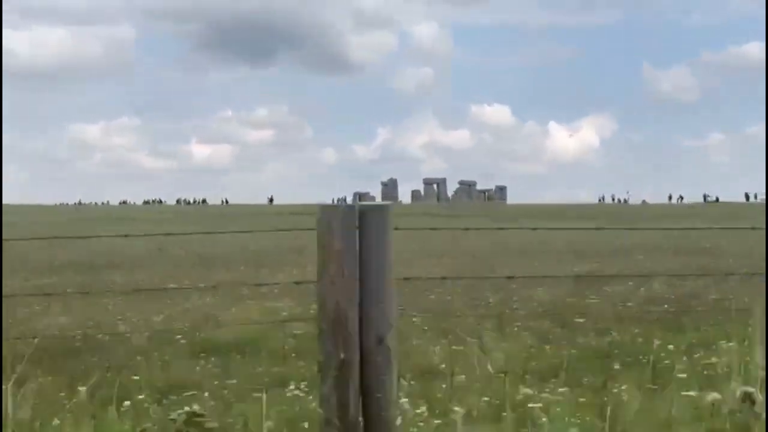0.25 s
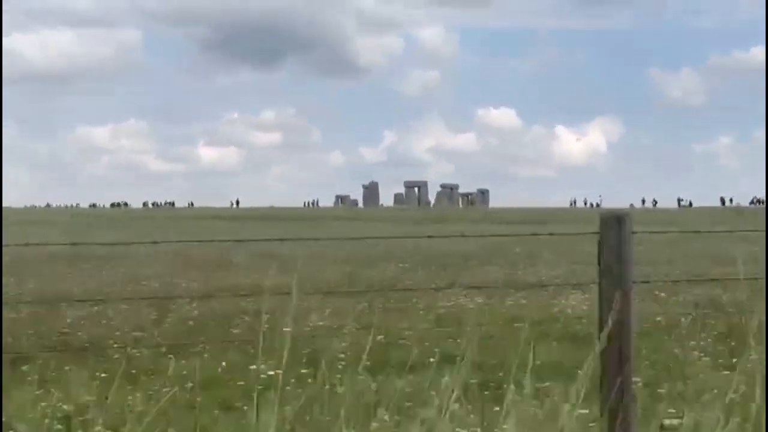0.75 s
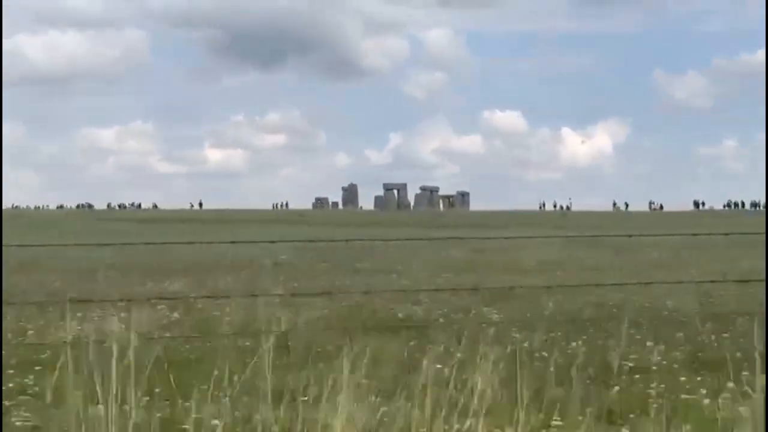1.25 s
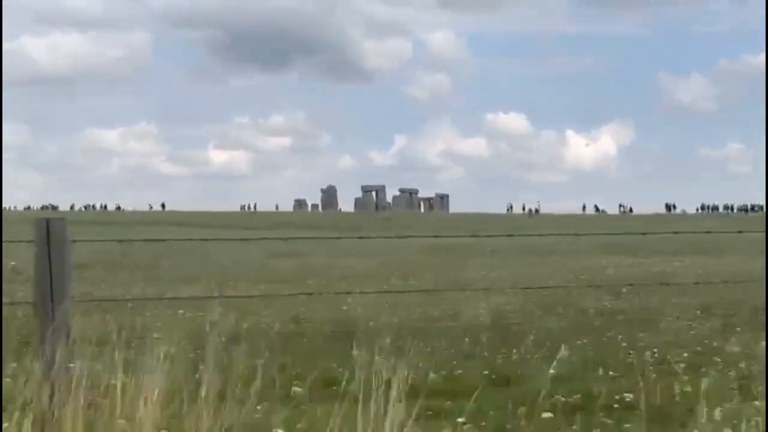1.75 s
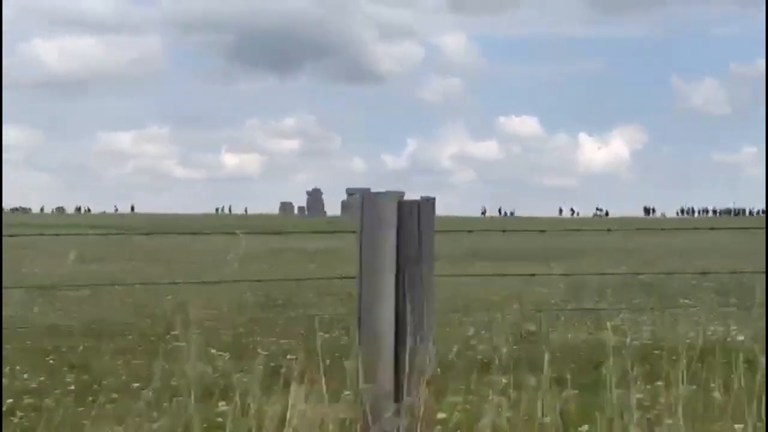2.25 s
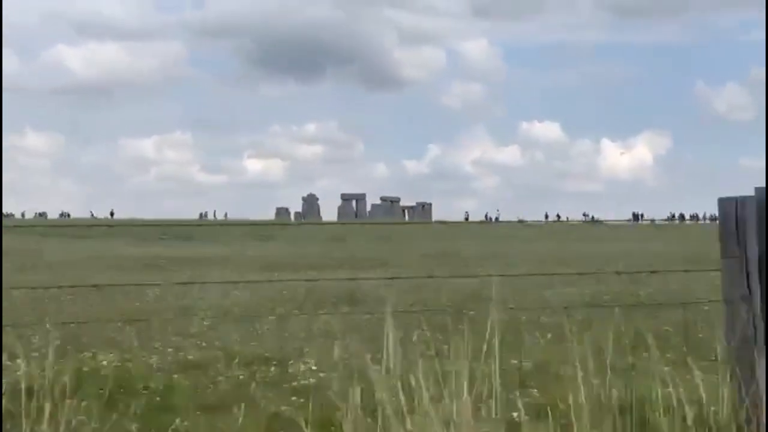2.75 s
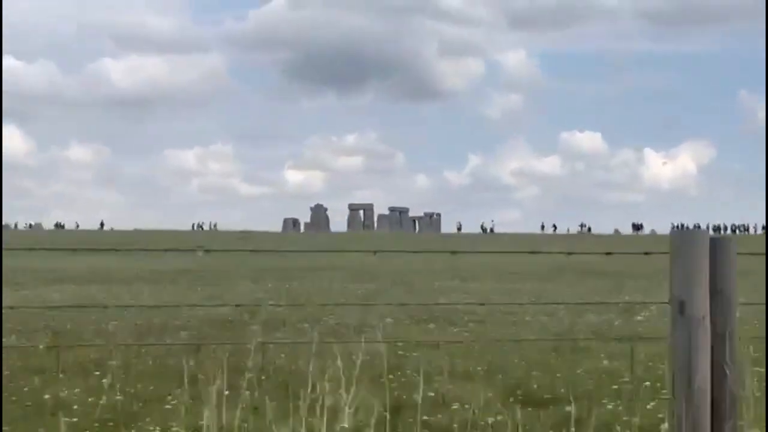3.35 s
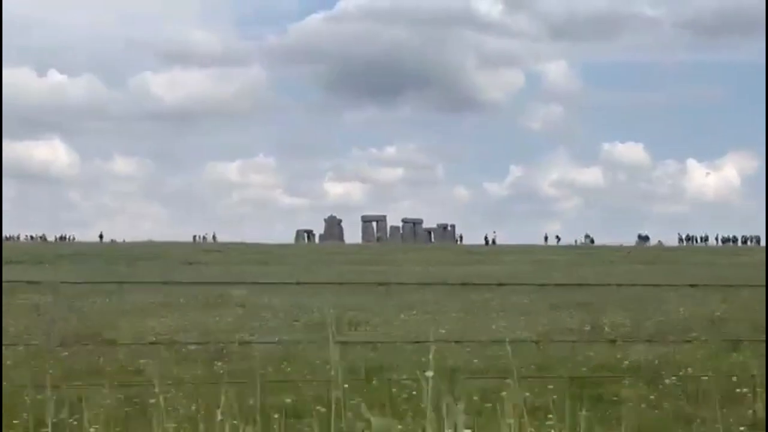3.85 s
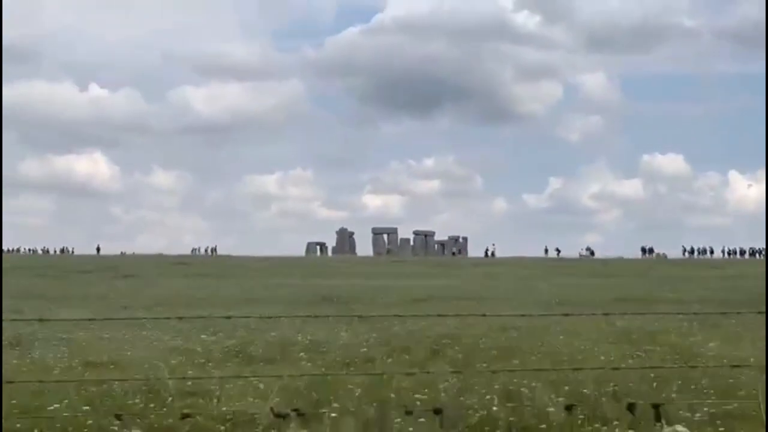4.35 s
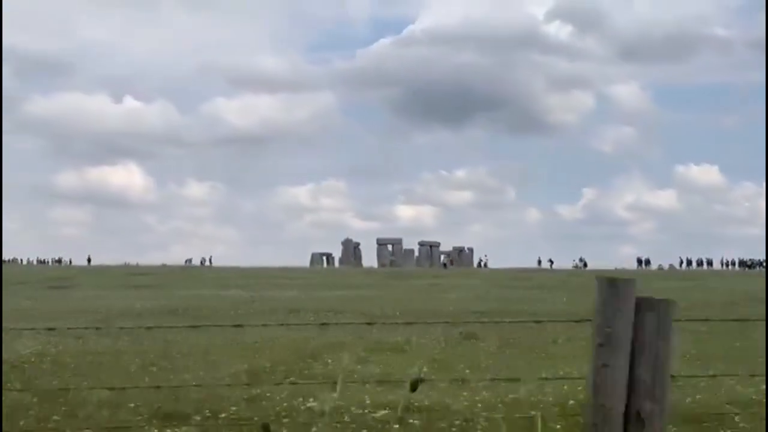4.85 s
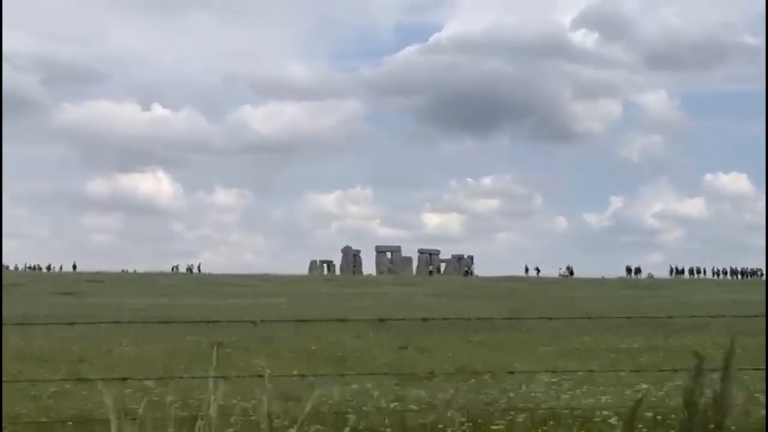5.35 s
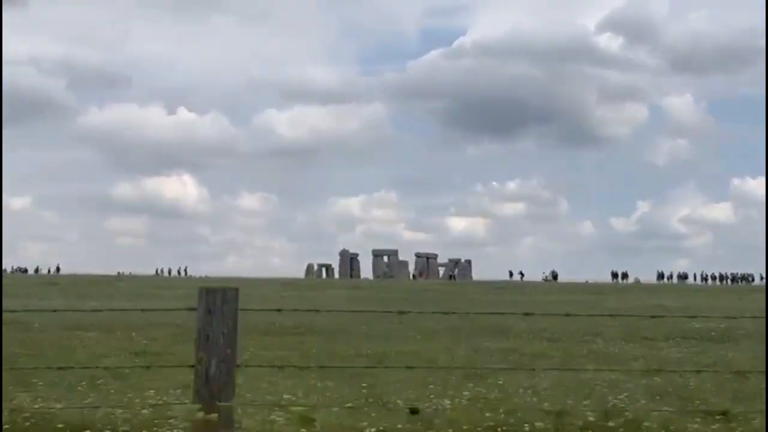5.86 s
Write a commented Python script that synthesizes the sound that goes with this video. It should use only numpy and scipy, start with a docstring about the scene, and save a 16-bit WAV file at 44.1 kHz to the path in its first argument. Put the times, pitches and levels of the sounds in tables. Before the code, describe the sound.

Close wind buffeting over constant road noise on a car ride past open grassland. Tyres roar dully and air rushes and hisses past the window frame. Eddies slap the microphone with short falling-pitch thuds, the hardest sharp and snapping; gusts flutter and rasp while the cabin booms deeply. A relative lull after three seconds gives way to frequent bassy knocks and a heavy, rumbling end.

```python
"""Wind on a phone at a car window

The phone is held at the open window of a moving car. Eddies slap the microphone port (falling-pitch pulses),
gusts flutter and rasp, the cabin booms and the air churns (shaped noise under level curves).
Tyre roar, window whoosh and hiss rush steadily behind (patchy noise bands)."""
import sys
import numpy as np
from scipy import signal
from scipy.fft import rfft, irfft, next_fast_len
from scipy.io import wavfile
from scipy.ndimage import uniform_filter1d, map_coordinates

SR = 44100
rng = np.random.default_rng(int(sys.argv[2]) if len(sys.argv) > 2 else 0)


def unload_wav(signal):
    """Save mono or channel-first audio to the path in sys.argv[1] as 16-bit WAV at rate SR, clipped to [-1, 1]."""
    wavfile.write(
        sys.argv[1],
        SR,
        np.round(np.clip(np.atleast_2d(signal).T, -1, 1) * 32767).astype(np.int16),
    )


N = 269010

# Spectra: f/Hz, relative density/dB per Hz; each noise is then scaled to rms 1.

# Eddies slapping the port: t/s, peak before the port muffles it/dB, starting pitch f/Hz
SLAP_EVENTS = [(.030, -20, 830), (0.782, -19.5, 230), (0.823, -16.5, 960), (.840, -17, 418),
               (.876, -19.5, 800), (.879, -18.5, 306), (0.926, -17.5, 298), (1.026, -18, 360),
               (1.065, -22, 850), (1.068, -18, 290), (1.074, -13.5, 1070), (1.083, -17, 623),
               (1.770, -18, 259), (1.794, -16.5, 371), (2.021, -15.5, 430), (2.038, -13.5, 1020),
               (2.042, -15, 645), (2.053, -18.5, 402), (2.0873, -7, 960), (2.092, -4, 342),
               (2.096, -12, 173), (2.0989, -13, 880), (2.1125, -12, 700), (2.1182, -12.5, 1140),
               (2.130, -14, 423), (2.148, -16.5, 880), (2.162, -4.5, 927), (2.167, -9.5, 250),
               (2.177, -10, 1190), (2.1892, -9, 1400), (2.181, -18, 254), (2.191, -11, 470),
               (2.205, -15, 260), (2.457, -2, 933), (2.468, -17, 860), (2.47, -11, 142), (2.508, -19, 335),
               (2.604, -17, 393), (2.972, -20, 475), (3.008, -19, 400), (3.0168, -12, 1170),
               (3.0215, -13, 1070), (3.03, -11, 1220), (3.035, -12.5, 420), (3.0454, -3, 916),
               (3.0476, -9.5, 147), (3.052, -15.5, 1110), (3.062, -19.5, 1110), (3.226, -19, 410),
               (3.259, -19.5, 318), (3.26, -17, 1110), (4.101, -16, 430), (4.109, -11, 363),
               (4.208, -16, 271), (4.236, -13.5, 350), (4.305, -14.5, 700), (4.307, -13.5, 247),
               (4.331, -16.5, 470), (4.367, -14, 376), (4.387, -18.5, 259), (4.466, -12, 226),
               (4.526, -16.5, 295), (4.563, -9, 226), (4.568, -13, 550), (4.598, -18, 250),
               (4.652, -16, 414), (4.676, -15.5, 434), (4.713, -19, 320), (4.760, -20, 323),
               (4.852, -13.5, 288), (4.884, -14, 716), (4.894, -19, 1000), (4.897, -13, 324),
               (4.926, -17, 280), (4.949, -21, 314), (4.981, -17, 606), (4.999, -14, 570),
               (5.253, -16, 240), (5.294, -18.5, 298), (5.402, -19.5, 378), (5.542, -18, 510),
               (5.581, -16.5, 260), (5.687, -17, 211), (5.708, -20.5, 340), (5.807, -11.5, 239),
               (5.833, -9, 483), (5.842, -10, 910), (5.852, -13, 131), (5.865, -15, 774), (5.883, -13, 250),
               (5.908, -13.5, 282), (5.927, -24, 970), (5.939, -14.5, 98), (5.954, -13, 427),
               (5.974, -13, 310), (5.989, -11, 250), (6.018, -11, 120), (6.039, -23, 238)]
# Air tearing at the port edge behind a fast slap: f/Hz, relative density/dB per Hz
TEAR_SPECTRUM = [(700, -26.5), (1300, 9), (1900, 2.5), (2300, -6), (3200, -23.5), (5000, -31.5),
                 (9000, -59.5)]
TEAR_RE_SLAP_DB, TEAR_DECAY_S = -20.5, 0.0052  # level for a slap pitched at port_hz

# Fluttering gusts: start t/s, crest level/dB, rasp level re flutter/dB, rise time/s
GUST_EVENTS = [(0.216, -26, -21, .012), (.772, -26.5, -10, 0.057), (1.057, -25, 1, 0.018),
               (1.761, -23.5, -12, 0.021), (2.017, -19.5, -8.5, 0.025), (2.095, -17, -6.5, 0.016),
               (2.169, -19, -5.5, 0.016), (2.516, -28, 0.5, 0.02), (3.007, -25, -4.5, 0.013),
               (3.047, -23, -0.5, 0.009), (3.246, -26.5, -9, 0.017), (4.1, -20.5, -17, 0.014),
               (4.29, -26, -17, 0.064), (4.525, -22, -16, 0.017), (4.664, -22.5, -9.5, 0.013),
               (4.882, -19.5, -14, 0.018), (4.973, -24, -7.5, 0.014), (5.536, -22, -8.5, 0.013),
               (5.812, -21, -7.5, 0.024), (5.945, -23, -15, 0.021)]
# Gust flutter: f/Hz, relative density/dB per Hz
FLUTTER_SPECTRUM = [(35, -14.5), (80, -4.5), (130, 4), (250, 1), (420, -1.5), (650, -22), (1100, -23),
                    (2000, -70.5)]
# Gust rasp: f/Hz, relative density/dB per Hz
RASP_SPECTRUM = [(200, -21), (500, 8.5), (750, 11), (1080, 5.5), (1300, -20.5), (1600, -9), (1850, -18),
                 (2400, -26), (5000, -42.5), (9000, -70.5)]

# How hard the airstream shakes the cabin air: t/s, boom level before RUMBLE_RE_BOOM_DB/dB
BOOM_CURVE = [(0.0, -22.5), (0.07, -32.5), (0.66, -33.5), (0.78, -28.5), (1.0, -29), (1.64, -29.5),
              (1.9, -27.5), (2.1, -25.5), (2.21, -17.5), (2.33, -38.5), (2.45, -26.5), (2.66, -24.5),
              (2.75, -34.5), (2.85, -29.5), (3.13, -32.5), (3.92, -34), (3.98, -24.5), (4.14, -27.5),
              (4.24, -23.5), (4.58, -22), (4.64, -30.5), (4.71, -26.5), (4.84, -28), (5.03, -30),
              (5.45, -28.5), (5.57, -19.5), (5.72, -25), (5.8, -18.5), (5.88, -14.5), (6.02, -18),
              (6.1, -21)]
# Lumps of air swelling the boom: crest t/s, level before RUMBLE_RE_BOOM_DB/dB
BOOM_LUMPS = [(.22, -26), (.45, -22), (1.07, -28), (1.15, -28.5), (1.45, -22.5), (1.58, -22), (1.78, -21),
              (2.473, -18.5), (3.05, -19), (3.28, -27), (3.34, -32), (3.67, -28), (3.82, -30.5),
              (4.916, -22), (5.14, -25), (5.27, -24), (5.861, -12)]
LUMP_HALF_WIDTH_S = 0.027  # crest to 1/e
# Cabin rumble: f/Hz, relative density/dB per Hz
RUMBLE_SPECTRUM = [(15, -34), (25, -14.5), (38, -3), (56, 1), (75, -3), (100, -8.5), (140, -16),
                   (220, -19.5), (500, -51.5), (1000, -100)]
RUMBLE_RE_BOOM_DB = 1
# Throb of a hard-shaken cabin: f/Hz, relative density/dB per Hz
THROB_SPECTRUM = [(50, -24), (95, -0.5), (130, 7.5), (190, -5), (300, -17.5), (600, -68)]
THROB_MAX_DB, THROB_DB_PER_BOOM_DB = -22.5, 1.56

# Turbulence at the port between gusts: t/s, level before CHURN_RE_WIND_DB/dB
WIND_CURVE = [(0.0, -40), (0.24, -35), (1.02, -31), (1.39, -34), (2.11, -29), (2.26, -35.5), (2.6, -37.5),
              (2.67, -40), (3.62, -37.5), (4.03, -33.5), (4.18, -30.5), (4.37, -33), (4.88, -32.5),
              (4.98, -36.5), (5.28, -32), (5.49, -31.5), (6.1, -30)]
# Churning air: f/Hz, relative density/dB per Hz
CHURN_SPECTRUM = [(50, -29.5), (110, 1.5), (160, -2), (260, -0.5), (400, -6), (600, -16), (1000, -19),
                  (1500, -41.5), (3000, -82)]
CHURN_RE_WIND_DB = 1.5

# Tyres and airstream, before trims: t/s, roar level/dB, window whoosh level/dB
DRIVE_CURVES = [(0.0, -37.5, -41.5), (0.59, -38.5, -49), (1.49, -35, -47.5), (2.53, -39.5, -43.5),
                (2.89, -37.5, -43), (3.28, -40.5, -41.5), (3.69, -39.5, -43.5), (5.84, -38, -41.5),
                (6.1, -39.5, -44.5)]
# Tyre roar: f/Hz, relative density/dB per Hz
ROAR_SPECTRUM = [(100, -2), (300, 2.5), (600, 0), (780, -1.5), (860, 6), (950, -2), (1070, 1), (1210, -1.5),
                 (1310, 1.5), (1410, -4.5), (1480, 0.5), (1650, -4.5), (2000, -11.5), (3200, -36),
                 (6000, -75.5)]
# Hollow note of the window opening: f/Hz, relative density/dB per Hz
WHOOSH_SPECTRUM = [(1000, -52.5), (1550, -9.5), (1690, -3), (1785, 4), (1900, 0), (2050, -1), (2220, -11),
                   (3200, -24.5), (6000, -76)]
# Air hissing past the window frame: f/Hz, relative density/dB per Hz
HISS_SPECTRUM = [(1200, -29), (2300, 1), (2800, 1.5), (3500, -1.5), (4600, -3.5), (5600, -11), (6500, -13),
                 (7300, -18), (9300, -22), (11700, -23), (12500, -46)]
HISS_MEAN_DB, HISS_DB_PER_WHOOSH_DB = -48, 0.19
ROAR_TRIM_DB, WHOOSH_TRIM_DB = 4.5, -2.0

# Left-right likeness of the wind, ahead of the pair's phase: f/Hz, correlation/1
WIND_CORRELATION = [(25, .997), (70, .991), (170, .92), (450, .96), (1500, .95)]
# Left-right likeness of the road, ahead of the pair's phase: f/Hz, correlation/1
ROAD_CORRELATION = [(100, 1), (400, 0.66), (700, 0.61), (1100, 0.35), (1500, 0.83), (1800, 0.8), (2300, 1),
                    (5500, 1), (7000, 0.59), (7800, 1)]
# Microphone pair phase: f/Hz, right lead/rad
PAIR_PHASE_RAD = [(100, 0), (300, -.2), (950, 0), (1200, .6), (1450, 2.3), (1630, 2.7), (1710, 0),
                  (6900, .1), (7700, 3.1), (9400, 3.1), (10000, 0)]
# Microphone pair balance: f/Hz, left minus right/dB
PAIR_BALANCE_DB = [(150, 0), (500, 1), (850, 3), (1120, 6), (1450, -1.5), (1900, -2.5), (3000, 0)]
TOP_HZ = 12000


def amp(db):
    """Decibels to gain."""
    return 10 ** (np.asarray(db) / 20)


def unit(x):
    """Scale to rms 1."""
    return x / np.sqrt(np.mean(x ** 2) + 1e-20)


def along(points, hz):
    """Interpolate (f/Hz, value) points on a log frequency axis."""
    f, v = np.transpose(points)
    return np.interp(np.log(hz + 1), np.log(f + 1), v)


def curves(rows):
    """One value per sample for each column after the time."""
    s, *cols = np.transpose(rows)
    return [np.interp(np.arange(N) / SR, s, c) for c in cols]


def wobble(rate_hz):
    """Smooth random curve with rate_hz knots a second."""
    knots = rng.standard_normal(int(N * rate_hz / SR) + 4)
    return map_coordinates(knots, [np.arange(N) * rate_hz / SR])


def filtered(x, response):
    """Apply a response of frequency by zero-padded FFT."""
    m = next_fast_len(N + SR // 2)
    return irfft(rfft(x, m) * response(np.fft.rfftfreq(m, 1 / SR)), m)[..., :N]


def rush(spectrum, correlation):
    """Stereo noise of rms 1; the mid-side split sets the left-right correlation."""
    def mid_side_gain(hz):
        angle = np.arccos(np.clip(along(correlation, hz), -1, 1)) / 2
        return amp(along(spectrum, hz)) * [np.cos(angle), np.sin(angle)]

    mid, side = filtered(rng.standard_normal((2, N)), mid_side_gain)
    return unit(np.array([mid + side, mid - side]))


def even(x, span_s):
    """Level out chance swells slower than span_s."""
    power = uniform_filter1d(np.mean(x ** 2, axis=0), int(span_s * SR) + 1)
    return x / np.sqrt(np.abs(power) + 1e-9)


def patchy(x, depth_db):
    """Eddies lift and shade narrow bands of a noise for a moment."""
    z = signal.stft(x, nperseg=1024)[2]
    field = rng.standard_normal(z.shape[1:])
    field = uniform_filter1d(field, size=4, axis=0)  # bins
    field = uniform_filter1d(field, size=7, axis=1)  # frames
    return unit(signal.istft(z * amp(depth_db * unit(field)), nperseg=1024)[1][:, :N])


def slaps(port_hz=1200, leak_db=-18, passage_s=0.012, crack_db=8, crack_grows=4, crack_hz=3000):
    """An eddy hits with a sharp edge; its pressure swings slow down and die as it passes the port."""
    t = np.arange(SR // 20) / SR
    push, crack, tear = np.zeros((3, N + 2 * len(t)))
    for s, db, hz in SLAP_EVENTS:
        age = t * hz  # in periods of the first swing
        turns = 3.264 * (1 - np.exp(-age / 3.48)) + 0.053 * age
        envelope = (1 - np.exp(-age / .5)) * np.exp(-age / 2.65 - (t / passage_s) ** 2)
        swing = np.sin(2 * np.pi * turns) * envelope
        start = round(s * SR)
        push[start:][:len(t)] += amp(db) * swing / np.abs(swing).max()
        # fast eddies tear; the hardest also crack, one starting period in
        speed = (hz / port_hz) ** 3
        tear[start:][:len(t)] += speed * amp(db + TEAR_RE_SLAP_DB) * np.exp(-t / TEAR_DECAY_S)
        crack_start = round((s + 1 / hz) * SR)
        crack[crack_start:][:len(t)] += speed * amp(crack_grows * db + crack_db) * np.exp(-t / .0001)
    muffled = signal.sosfilt(signal.butter(4, port_hz, fs=SR, output="sos"), push)
    snap = signal.sosfilt(signal.butter(4, crack_hz, fs=SR, output="sos"), crack)
    torn = tear[:N] * rush(TEAR_SPECTRUM, WIND_CORRELATION)
    return (muffled + amp(leak_db) * push + snap)[:N] + torn


def gusts():
    """Each gust swells quickly and ebbs; its ragged rasp rides above the flutter."""
    t = np.arange(N) / SR
    flutter, rasp = np.zeros(N), np.zeros(N)
    for s, db, rasp_db, rise_s in GUST_EVENTS:
        u = np.maximum(t - s, 0) / rise_s
        swell = amp(db) * u * np.exp((1 - u ** 2) / 2)  # crest at u = 1
        flutter += swell
        rasp += swell * amp(rasp_db)
    low = flutter * even(rush(FLUTTER_SPECTRUM, WIND_CORRELATION), span_s=0.057)
    ragged = amp(4.5 * wobble(220))  # air tears in bursts of a few ms
    high = rasp * even(ragged * rush(RASP_SPECTRUM, WIND_CORRELATION), span_s=0.026)
    return low + high


def rumble(boom_db):
    """The cabin air booms in uneven swells, heaped up by lumps of air."""
    t = np.arange(N) / SR
    swells = sum(amp(db) * np.exp(-((t - s) / LUMP_HALF_WIDTH_S) ** 2) for s, db in BOOM_LUMPS)
    boom = np.hypot(amp(boom_db + 1.45 * wobble(12)), swells)
    return amp(RUMBLE_RE_BOOM_DB) * boom * even(rush(RUMBLE_SPECTRUM, WIND_CORRELATION), span_s=0.05)


def throb(boom_db):
    """A hard-shaken cabin throbs above its boom, growing faster than the boom does."""
    level_db = THROB_MAX_DB + THROB_DB_PER_BOOM_DB * (boom_db - boom_db.max())
    return amp(level_db) * even(rush(THROB_SPECTRUM, WIND_CORRELATION), span_s=0.042)


def churn():
    """Turbulent air churns at the port in quick lumps."""
    strength_db, = curves(WIND_CURVE)
    lumps = amp(3.5 * wobble(50))
    noise = even(lumps * rush(CHURN_SPECTRUM, WIND_CORRELATION), span_s=0.067)
    return amp(strength_db + CHURN_RE_WIND_DB) * noise


def roar(roar_db):
    """Tyre roar: broad noise with a slight level wobble."""
    level_db = roar_db + ROAR_TRIM_DB + 0.51 * wobble(9.3)
    return amp(level_db) * patchy(rush(ROAR_SPECTRUM, ROAD_CORRELATION), depth_db=1.5)


def whoosh(whoosh_db):
    """The window opening colours the airstream with a hollow note."""
    level_db = whoosh_db + WHOOSH_TRIM_DB + 0.85 * wobble(12)
    return amp(level_db) * patchy(rush(WHOOSH_SPECTRUM, ROAD_CORRELATION), depth_db=2.0)


def hiss(whoosh_db):
    """Air hisses past the window frame, weakly following the whoosh."""
    follow_db = HISS_DB_PER_WHOOSH_DB * (whoosh_db - whoosh_db.mean())
    level_db = HISS_MEAN_DB + follow_db + 0.13 * wobble(8.2)
    return amp(level_db) * patchy(rush(HISS_SPECTRUM, ROAD_CORRELATION), depth_db=1.84)


def scene():
    """Wind and road, picked up by two microphones with their own phase and balance."""
    boom_db, = curves(BOOM_CURVE)
    roar_db, whoosh_db = curves(DRIVE_CURVES)
    wind = slaps() + gusts() + rumble(boom_db) + throb(boom_db) + churn()
    road = roar(roar_db) + whoosh(whoosh_db) + hiss(whoosh_db)
    half = np.array([[.5], [-.5]])  # left, right

    def pair(hz):
        gain = amp(half * along(PAIR_BALANCE_DB, hz))
        return gain * np.exp(-1j * half * along(PAIR_PHASE_RAD, hz))

    return filtered(wind + road, pair)


def record(dry):
    """Peaks round off just under full scale; nothing is kept from TOP_HZ up."""
    rounded = dry / (1 + np.abs(dry / .97) ** 8) ** (1 / 8)
    return filtered(rounded, lambda hz: hz < TOP_HZ)


dry = scene()
out = record(dry)
unload_wav(out)
```